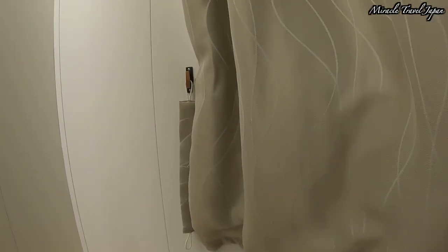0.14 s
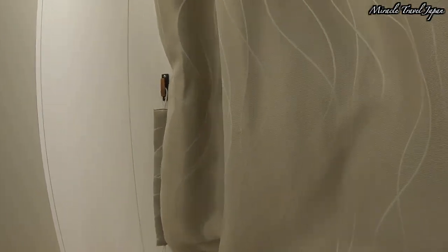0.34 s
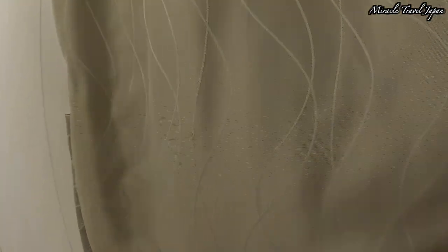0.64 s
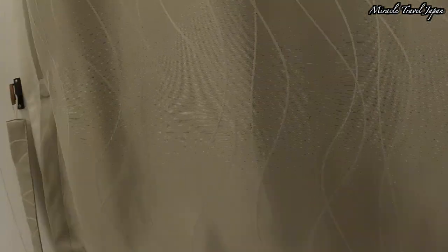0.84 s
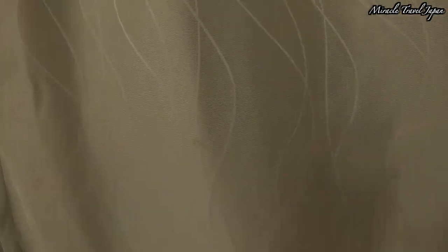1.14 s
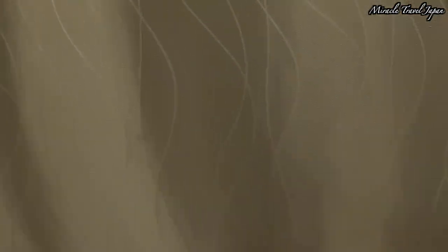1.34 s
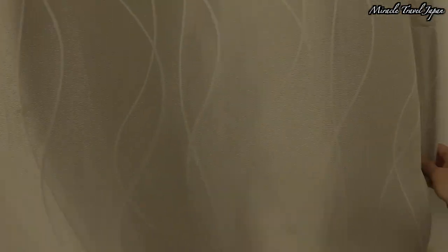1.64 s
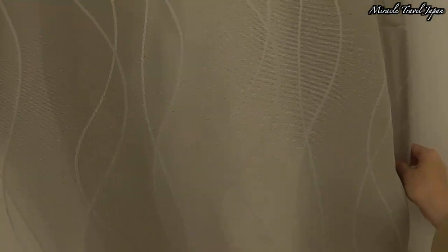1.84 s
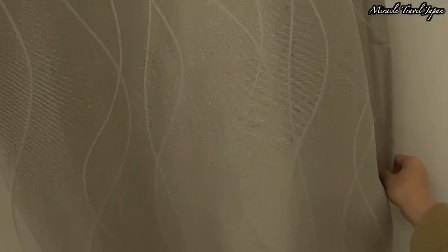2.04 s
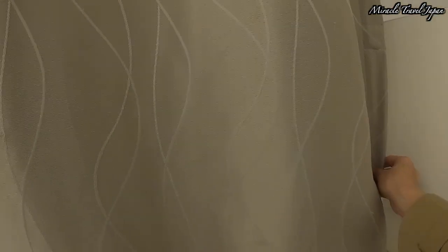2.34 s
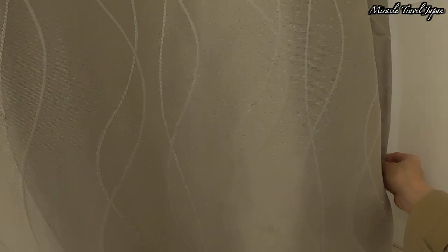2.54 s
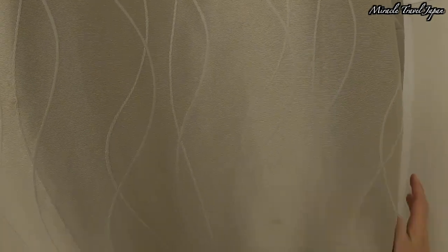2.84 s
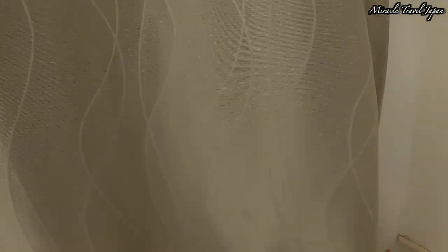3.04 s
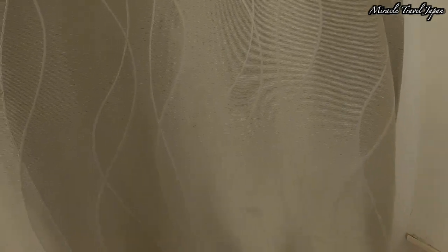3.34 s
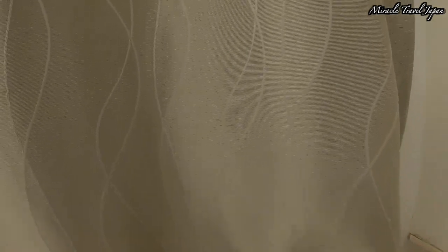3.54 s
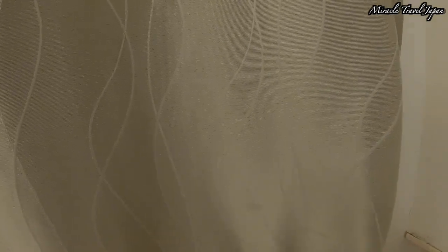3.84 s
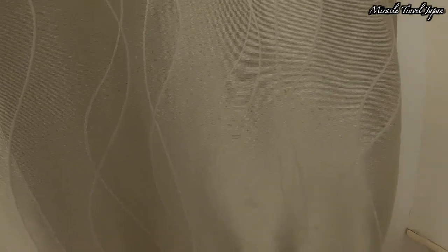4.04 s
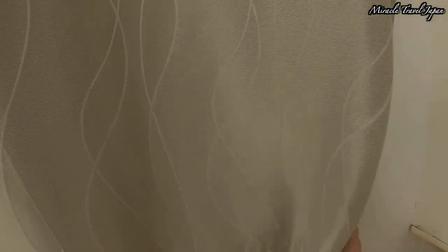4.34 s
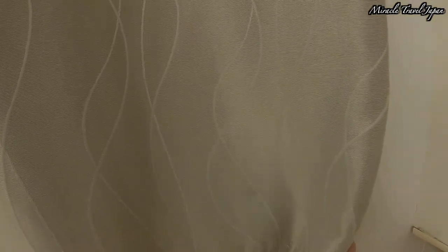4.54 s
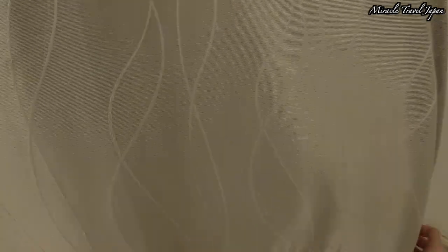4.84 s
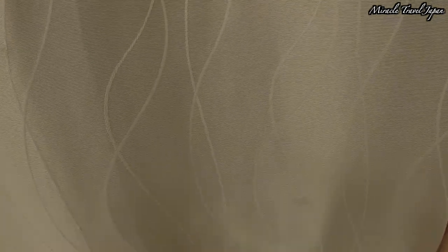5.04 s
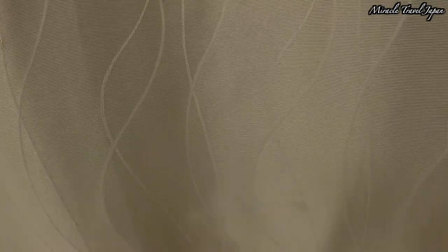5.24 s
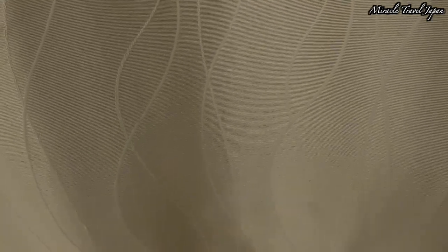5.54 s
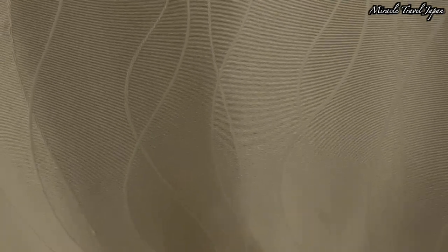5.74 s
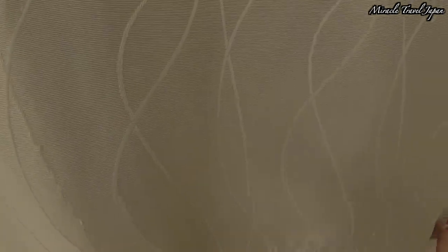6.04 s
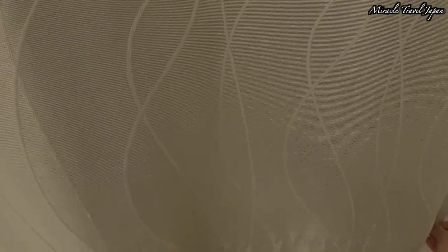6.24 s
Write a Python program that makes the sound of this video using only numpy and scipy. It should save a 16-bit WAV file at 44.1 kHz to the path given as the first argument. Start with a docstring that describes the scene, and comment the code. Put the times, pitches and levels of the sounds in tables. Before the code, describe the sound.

Close, stereo, indoors: a hand draws a fabric curtain, its plastic gliders making a short metallic-bright chatter that slows into a cluster of ticks. Gentle rustles fill the gaps over constant low humming air. Midway comes one loud, dry double-contact clack with a brief panel thud, then busier cloth handling and tiny clicks, and finally another loud clack of several rapid contacts. The snaps are far louder than everything else.

```python
"""Cabin curtain with a magnetic catch

A curtain is drawn along its rail in a small cabin. Gliders rattle in the track as streams of tiny impacts
through rail resonances; the cloth swishes as shaped noise, and small parts tick as short decaying tones.
Twice a magnetic catch in the hem snaps onto the wall panel: brief rings, cracks and a panel thump.
Ventilation rushes as coloured noise and hums, with a thin whine; a far engine throbs as wavering low sines.
"""
import sys
import numpy as np
from scipy import signal
from scipy.fft import rfft, irfft, next_fast_len
from scipy.io import wavfile
from scipy.ndimage import uniform_filter1d, map_coordinates

SR = 44100
rng = np.random.default_rng(int(sys.argv[2]) if len(sys.argv) > 2 else 0)


def transcribe(signal):
    """Save signal, clipped to [-1, 1], as a 16-bit WAV file at the path in sys.argv[1]."""
    frames = np.atleast_2d(signal).T
    limited = np.clip(frames, -1, 1)
    pcm = np.round(limited * 32767).astype(np.int16)
    wavfile.write(sys.argv[1], SR, pcm)


N = 281666

# slow swell of the ventilation: (time [s], rumble level [dB], duct hum level [dB])
AIR_SWELL = [(0, -41.5, -48), (.5, -39.5, -51.5), (1.4, -39, -51), (2.2, -44, -47), (3.3, -39, -49),
             (4.3, -41.5, -46.5), (5.0, -38, -49), (5.8, -39, -48), (6.39, -48, -50)]
# spectra of the low rumble and the duct hum: (frequency [Hz], density [dB per Hz])
RUMBLE_SPECTRUM = [(8, -22.5), (15, -8), (25, -4), (36, 0), (60, -8), (110, -15.5), (200, -34.5)]
DUCT_SPECTRUM = [(60, -21.5), (100, -12.5), (139, -1), (214, -15.5), (255, -4), (300, -18), (480, -25),
                 (640, -46.5), (790, -31), (850, -29), (920, -33), (1450, -31.5), (1900, -38), (2300, -55)]
# thin tones of the fan, before they waver: (frequency [Hz], rms level [dB])
FAN_WHINE = [(839.8, -79), (1287, -78.5), (1459, -80.5)]

# multiples of the engine's turning rate, from the second up, before they waver: (rms level [dB])
THROB_LEVELS = [-40.5, -40.5, -41, -45, -50.5, -51]
ENGINE_HZ = 7.45  # turns a second
BEAT_S, BEAT_PEAK_S, BEAT_DEPTH = 4.33, 3.83, .6  # swell of the lowest throb: period, a loudest moment, share

# moves of the hand in the cloth:
# (peak time [s], swell [s], fade [s], swish level [dB], weave over swish [dB], folds level [dB])
STROKES = [(.2, 0.61, 1.2, -49.5, -21, -62), (.36, 0.23, 0.12, -54, -29, -48.5),
           (.42, .3, .5, -73, -20.5, -54), (1.12, .4, 0.27, -64, -18.5, -49),
           (1.27, 0.083, 0.54, -61.5, -19, -77), (1.71, 0.37, 0.66, -58.5, -22.5, -61.5),
           (1.9, .5, 1.9, -67, -15, -69), (2.36, 0.25, 0.53, -64.5, -15, -74.5),
           (2.68, 0.026, 0.17, -63, -20, -53.5), (2.991, 0.69, 0.26, -56.5, -18, -57.5),
           (3.25, 0.27, 1.15, -70.5, -16, -77), (3.52, 0.13, .15, -67, -15, -67.5),
           (3.661, 0.056, 0.12, -65, -30, -54), (3.92, .06, 0.33, -64.5, -16, -60),
           (3.99, 0.17, 0.54, -60.5, -22.5, -61), (4.11, 0.096, 0.44, -64.5, -10, -80),
           (4.35, 0.093, 0.058, -53, -19, -54), (4.40, .05, 0.12, -53.5, -22, -49),
           (4.63, 0.38, 0.084, -62, -14.5, -71), (4.8, 0.087, .3, -59, -12, -65.5),
           (4.853, .03, 0.044, -45.5, -34, -52), (4.88, 0.11, 0.28, -53, -19, -55.5),
           (4.96, 0.12, 0.16, -56.5, -20, -55), (5.06, 0.014, .015, -47.5, -20, -71),
           (5.08, 0.17, 0.22, -69, -10, -54.5), (5.39, 0.032, 0.2, -67.5, -12.5, -67.5),
           (5.72, 0.18, .1, -64, -16, -70), (5.83, 0.13, .5, -63, -17, -68),
           (6.04, 0.2, 0.32, -61, -17, -63), (6.2, 0.17, 0.091, -63, -18, -67),
           (6.39, .1, 0.05, -58.5, -27, -64)]
STROKE_RANGE_DB = 20  # swell and fade times span this many dB
# spectra of the cloth's swish, fine weave and heavy folds: (frequency [Hz], density [dB per Hz])
SWISH_SPECTRUM = [(900, 2), (1500, 3), (2500, -2), (5000, -3.5), (7800, -11.5), (9500, -36)]
WEAVE_SPECTRUM = [(7000, -25.5), (8800, 3.5), (12000, -1.5), (13200, -5.5), (14500, -39.5)]
FOLDS_SPECTRUM = [(60, -18), (120, -4), (200, -9), (300, -5), (420, 1), (650, -1.5), (1000, -8.5),
                  (1500, -20.5)]

# pull along the rail: (time [s], rattle level [dB])
PULL = [(.34, -54), (.38, -45), (.45, -40), (.55, -27.5), (.64, -25), (.72, -24.5), (.80, -29),
        (.86, -37.5), (.92, -35), (.98, -39.5), (1.045, -40), (1.06, -44.5), (1.1, -48.5), (1.2, -57.5),
        (1.32, -75.5)]
# rail resonances that the gliders excite: (centre [Hz], width [Hz], relative level [dB])
RAIL_MODES = [(3450, 150, 1), (4054, 330, 0.5), (4420, 393, 1.5), (4840, 395, 1), (7065, 520, -8),
              (10300, 1400, -23.5)]
# narrow modes of gliders dragging singly, before squaring: (centre [Hz], width [Hz], relative level [dB])
CLEAR_MODES = [(3510, 160, -6), (3943, 230, -1.5), (4200, 130, -2), (4880, 120, -10), (7320, 82, -2.5)]
# spectra of the rail's low drone and its fizz: (frequency [Hz], density [dB per Hz])
DRONE_SPECTRUM = [(210, -44.5), (350, -16.5), (663, -4), (837, -7), (941, 0.5), (1190, -8), (1770, -6.5),
                  (2170, -13), (3000, -15), (3900, -38.5), (6600, -120)]
FIZZ_SPECTRUM = [(1470, -46.5), (2500, -8.5), (3390, -3.5), (4840, -10.5), (5810, -10.5), (7440, -13.5),
                 (8060, -16), (10400, -24), (14200, -38.5)]
# left-right balance of the rail: (frequency [Hz], left over right [dB])
RAIL_BALANCE = [(60, -1.5), (110, -4), (200, 3), (380, 1), (690, 3), (1270, 2.5), (2340, 4.5), (4320, 0),
                (7960, 4), (14700, -0.5)]
DRONE_TOP_DB, DRONE_OVER_DB = -31.5, 2.5  # ceiling of the drone; its level over the rattle well below that
FIZZ_DB, FIZZ_GROWS = -3.5, .05  # fizz over rattle at full pull; dB lost for each dB the pull weakens
SLOW_FROM_S, SLOW_TO_S, SLOW_EDGE_S = .75, 1.045, .01  # slow end of the pull, when gliders drag singly
CLEAR_FAST_DB, CLEAR_SLOW_DB = -8.5, -2.5  # clear ring over the rattle in the fast and in the slow part

# glider and hook ticks:
# (time [s], level [dB], pitch [Hz], T60 [s], crack over ring [dB], left over right [dB])
TICKS = [(0.393, -42, 3930, 0.055, -6, 5), (0.993, -26.5, 4140, 0.032, -19, 3),
         (1.0155, -31.5, 7230, 0.032, 5, 4.5), (1.015, -23, 4200, .015, -13, 7),
         (1.0207, -25, 4440, .012, -12, 3), (1.025, -25, 4250, .012, -14, 3),
         (1.0337, -42, 7060, .03, -16, 1), (2.997, -47.5, 1250, 0.06, -25, 4),
         (3.636, -49, 2690, 0.022, -4, -5), (3.659, -50, 2850, 0.035, -9, -2),
         (3.665, -51, 3010, 0.04, -14, -2.5), (4.327, -43.5, 3510, 0.013, -6, -4),
         (4.393, -36.5, 2517, 0.057, -23, -2), (4.4022, -41, 2590, 0.03, -17, -12),
         (4.411, -40, 2440, 0.023, -23, -1), (4.846, -33.5, 4250, 0.045, -0.5, 5),
         (4.883, -40.5, 4140, 0.028, -14, 6), (4.9452, -42.5, 3940, .03, -12, 5),
         (4.984, -50, 4000, .025, -12, 8), (5.0538, -49, 5270, 0.021, -3, -2)]
# crack of a tick: (frequency [Hz], gain [dB])
TICK_CRACK_COLOUR = [(1200, -15), (2000, 0), (6500, -3), (8500, -16), (13000, -24)]

# contacts of the catch: (time [s], ring level [dB], brightness [dB per two octaves above the second mode],
#                         crack drive [dB], panel thump drive [dB], left over right [dB])
SNAPS = [(3.0342, -3.5, 14, -6, -7.5, 0), (3.0400, -10.5, -8, -12, -7.5, 8),
         (6.0480, -6, 4, -8.5, -13.5, -3.5), (6.0547, -6.5, 8, -9, -7.5, -6), (6.0595, -6, -11, -20, -8, 1),
         (6.0650, -4, -17, -40, -8.5, 7)]
# modes of the catch: (frequency [Hz], relative level [dB], T60 [s])
CATCH_MODES = [(284.8, -19.5, 0.032), (1355, -1.5, 0.0061), (2090, -19, 0.026), (3700, -32, 0.0014),
               (4250, -0.5, 0.0017)]
# crack of a contact: (frequency [Hz], gain [dB])
CRACK_COLOUR = [(700, -44), (1500, 1), (3000, -3), (5200, -10.5), (6200, -29), (10000, -40.5)]
# wall panel thump, one list for the upper and one for the lower catch: (frequency [Hz], density [dB per Hz])
PANEL_SPECTRA = [
    [(35, -55), (60, -8), (136, -1.5), (342, -9.5), (430, -8.5), (526, -9), (606, -7), (1170, -12),
     (1290, -7.5), (2930, -27.5), (4600, -32), (8000, -63), (10400, -91), (17600, -120)],
    [(28, -14.5), (55, 6.5), (85, -6.5), (151, -2), (296, -5), (387, -11), (474, -1), (547, -8.5),
     (1240, -7), (3120, -28.5), (4800, -34), (8000, -54), (10400, -95), (17600, -120)],
]
# wall panel modes: (centre [Hz], width [Hz], level over the thump [dB])
PANEL_MODES = [(121, 16, 9.5), (188, 27, 1), (263, 8.7, 5.5), (336, 14, 7), (444, 17, -4), (993, 16, 7),
               (1360, 44, -22), (1640, 27, -7)]
# dying away of the wall panel: (frequency [Hz], T60 [s])
PANEL_DECAY = [(100, 0.27), (200, 0.41), (350, 0.42), (1000, 0.28), (3000, 0.29), (6000, 0.29)]
LOWER_FROM_S = 5  # the hand has moved to the lower catch
PUSH = 0.49  # size of the first push on the panel against its scattered answer

# stereo likeness of rail, far sounds and wall panel: (frequency [Hz], likeness [0-1])
NEAR_ALIKE = [(300, .93), (700, .82), (1400, .76), (2800, .62), (4500, .8), (9000, .6), (13000, .75)]
FAR_ALIKE = [(30, .98), (80, .98), (170, .993), (300, .94), (630, .7), (1400, .65), (3000, .45), (7000, .6),
             (14000, .5)]
PANEL_ALIKE = [(60, .97), (140, .998), (400, .93), (1000, .8), (2500, .78), (5000, .85)]

# steady hiss of the microphone: (frequency [Hz], density [dB per Hz])
HISS_SPECTRUM = [(1500, 9.5), (3000, -6), (7500, -3), (9000, -12.5), (14000, -28.5)]
TOP_HZ = 15200  # nothing is heard above


def amp(db):
    """Decibels to gain."""
    return 10 ** (np.asarray(db) / 20)


def unit(x):
    """Scaled to rms 1."""
    return x / np.sqrt(np.mean(x ** 2) + 1e-20)


def along(points, hz):
    """Reads (frequency, value) points on a log frequency axis."""
    f, values = np.transpose(points)
    return np.interp(np.log(hz + 1), np.log(f + 1), values)


def curves(rows):
    """One value per sample for each column after the time."""
    times, *columns = np.transpose(rows)
    return [np.interp(np.arange(N) / SR, times, column) for column in columns]


def wobble(rate):
    """A smooth random curve, rate knots a second."""
    knots = rng.standard_normal(int(N * rate / SR) + 4)
    return map_coordinates(knots, [np.arange(N) * rate / SR])


def filtered(x, response):
    """x through a complex response of frequency."""
    size = next_fast_len(N + SR // 2)
    hz = np.fft.rfftfreq(size, 1 / SR)
    return irfft(rfft(x, size) * response(hz), size)[..., :N]


def coloured(spectrum):
    """Response with the given spectrum, closing steeply outside it."""
    below, above = (spectrum[0][0] / 2, -120), (spectrum[-1][0] * 2, -120)
    closed = [below] + list(spectrum) + [above]
    return lambda hz: amp(along(closed, hz))


def resonances(modes):
    """Causal response of damped modes, with alternating signs."""
    def mode(f, centre, width, db):
        return amp(db) * 1j * f * width / (centre * centre - f * f + 1j * f * width)
    return lambda f: sum((-1) ** k * mode(f, *row) for k, row in enumerate(modes))


def causal(response):
    """Minimum phase: the same colour, with nothing ahead of the blow."""
    def delayed(hz):
        cepstrum = irfft(np.log(np.abs(response(hz)) + 1e-6))
        cepstrum[1:len(hz) - 1] *= 2
        cepstrum[len(hz):] = 0
        return np.exp(rfft(cepstrum))
    return delayed


def grains(grain_db):
    """Two streams of tiny impacts with unequal but bounded level boosts."""
    boost = np.minimum(rng.exponential(size=N), np.e)
    return rng.standard_normal((2, N)) * amp(grain_db * boost)


def spread(pair, response, alike):
    """Colours two streams and mixes them to a stereo image of rms 1."""
    def mid_side(hz):
        turn = np.arccos(np.clip(along(alike, hz), 0, 1)) / 2
        return response(hz) * [np.cos(turn), np.sin(turn)]
    mid, side = filtered(pair, mid_side)
    return unit(np.array([mid + side, mid - side]))


def add(track, s, sound, pan_db):
    """Places a sound at time s with a left-right level step."""
    start = round(s * SR)
    track[:, start:start + sound.shape[-1]] += sound * amp([[pan_db / 2], [-pan_db / 2]])


def dying(decay):
    """Stereo noise, left energy 1, in which each frequency dies at its own speed."""
    hz, t, cells = signal.stft(rng.standard_normal((2, SR // 2)), SR, nperseg=256)
    fade = amp(-60 * t / along(decay, hz)[:, None])
    tail = signal.istft(cells * fade, SR, nperseg=256)[1]
    return tail / np.linalg.norm(tail[0])


def ventilation():
    """Swelling low rumble and a breathy duct hum, both shaped noise, with thin wavering fan tones."""
    t = np.arange(N) / SR
    rumble_db, duct_db = curves(AIR_SWELL)
    rumble = amp(rumble_db) * spread(rng.standard_normal((2, N)), coloured(RUMBLE_SPECTRUM), FAR_ALIKE)
    breath_db = 1.8 * wobble(4)
    duct = spread(rng.standard_normal((2, N)), coloured(DUCT_SPECTRUM), FAR_ALIKE)
    duct = amp(duct_db + breath_db) * duct
    whine = 0
    for hz, db in FAN_WHINE:
        level = np.sqrt(2) * amp(db + 3 * wobble(7.9))
        whine = whine + level * np.sin(2 * np.pi * hz * t + 1.3 * wobble(6))
    return rumble + duct + whine


def engine():
    """Low multiples of the turning rate, each wavering a little in level and phase."""
    t, total = np.arange(N) / SR, 0
    beat = 1 + np.clip(BEAT_DEPTH, 0, 1) * np.cos(2 * np.pi * (t - BEAT_PEAK_S) / BEAT_S)
    for k, db in enumerate(THROB_LEVELS, start=2):
        phase = 2 * np.pi * (k * ENGINE_HZ * t + rng.random()) + .4 * wobble(1.53)
        level = np.sqrt(2) * amp(db + 2.5 * wobble(1.5))
        swell = beat if k == 2 else 1
        total = total + level * swell * np.sin(phase)
    return total


def cloth():
    """Fabric rubbing on fabric: each stroke swells and fades in swish, fine weave hiss and low folds."""
    spectra = (SWISH_SPECTRUM, WEAVE_SPECTRUM, FOLDS_SPECTRUM)
    layers = np.array([spread(grains(grain_db=3.0), coloured(s), FAR_ALIKE) for s in spectra])
    t, power = np.arange(N) / SR, np.zeros((3, N))
    for s, swell, fade, swish_db, weave_db, folds_db in STROKES:
        shape = amp(-STROKE_RANGE_DB * np.maximum((s - t) / swell, (t - s) / fade))
        levels = amp([swish_db, swish_db + weave_db, folds_db])
        power += np.outer(levels, shape) ** 2  # strokes overlap by power
    mix = (np.sqrt(power)[:, None] * layers).sum(0)
    return mix * amp(1.0 * wobble(40))


def rail():
    """Gliders chatter over the track and set its resonances going."""
    before, after = (PULL[0][0] - .05, -100), (PULL[-1][0] + 0.13, -100)
    rattle_db, = curves([before] + list(PULL) + [after])
    # these levels are relative to the rattle
    drone_db = -10 * np.log10(amp(-2 * DRONE_OVER_DB) + amp(2 * (rattle_db - DRONE_TOP_DB)))
    fizz_db = FIZZ_DB + FIZZ_GROWS * (rattle_db - rattle_db.max())
    clear_db, = curves([(SLOW_FROM_S - SLOW_EDGE_S, CLEAR_FAST_DB), (SLOW_FROM_S, CLEAR_SLOW_DB),
                        (SLOW_TO_S, CLEAR_SLOW_DB), (SLOW_TO_S + SLOW_EDGE_S, 2 * CLEAR_FAST_DB)])
    jerk = wobble(90)  # the gliders stick and slip in clumps
    flutter_db = 3 * wobble(60)

    rattle = amp(1.1 * jerk) * spread(grains(grain_db=5), resonances(RAIL_MODES), NEAR_ALIKE)
    sharp_modes = lambda hz: resonances(CLEAR_MODES)(hz) ** 2
    clear = amp(clear_db + flutter_db) * spread(grains(grain_db=4), sharp_modes, NEAR_ALIKE)
    drone = spread(grains(grain_db=3.0), coloured(DRONE_SPECTRUM), NEAR_ALIKE)
    drone = amp(drone_db + 0.66 * jerk) * drone
    fizz = spread(grains(grain_db=1.0), coloured(FIZZ_SPECTRUM), NEAR_ALIKE)
    fizz = amp(fizz_db + 0.28 * jerk) * fizz

    sound = amp(rattle_db) * (rattle + clear + drone + fizz)
    return filtered(sound, lambda hz: amp(np.outer([.5, -.5], along(RAIL_BALANCE, hz))))


def ticks():
    """Small plastic parts touching: one rough mode over a short dull crack."""
    ring, crack = np.zeros((2, 2, N + SR))
    t = np.arange(SR // 10) / SR
    rise = 1 - np.exp(-(t / 0.00067) ** 2)
    for s, db, hz, t60, crack_db, pan_db in TICKS:
        drift = uniform_filter1d(np.cumsum(rng.standard_normal(len(t))), size=30)  # roughens the pitch
        tone = np.sin(2 * np.pi * hz * t + 0.16 * drift)
        add(ring, s, amp(db - 60 * t / t60) * rise * tone, pan_db)
        noise = rng.standard_normal(len(t))
        add(crack, s, amp(db + crack_db - 60 * t / 0.044) * rise * noise, pan_db)
    return ring[:, :N] + filtered(crack[:, :N], coloured(TICK_CRACK_COLOUR))


def cabin(x):
    """The small room answers with a diffuse tail whose treble dies first."""
    late = np.pad(x.mean(0), (200, 0))[None]  # delay in samples
    tail = dying([(300, .35), (3000, .22), (9000, 0.12)])
    return signal.fftconvolve(late, tail, axes=1)[:, :N]


def catch():
    """Each contact rings the catch briefly, cracks, and shakes the wall panel."""
    ring, crack, *thumps = np.zeros((4, 2, N + SR))
    t = np.arange(SR // 20) / SR
    rise = 1 - np.exp(-(t / 0.00053) ** 2)
    for s, db, bright_db, crack_db, thump_db, pan_db in SNAPS:
        sound = 0
        for hz, level, t60 in CATCH_MODES:
            octaves_up = max(0, np.log2(hz / CATCH_MODES[1][0]))
            mode_db = level + bright_db * octaves_up / 2 - 60 * t / t60
            sound = sound + amp(mode_db) * np.sin(2 * np.pi * hz * t)
        add(ring, s, amp(db) * sound * rise, pan_db)

        # noise shared by both sides, plus some of each side's own
        noise = rng.standard_normal(len(t)) + 0.46 * rng.standard_normal((2, len(t)))
        add(crack, s, amp(crack_db - 60 * t / 0.015) * rise * noise, pan_db)

        tail = dying(PANEL_DECAY)
        n = np.arange(tail.shape[1])
        tail = tail * (1 - np.exp(-n / SR / 0.00188)) + PUSH * (n == 0)
        add(thumps[int(s > LOWER_FROM_S)], s, amp(thump_db) * tail, 0)

    total = ring[:, :N] + filtered(crack[:, :N], causal(coloured(CRACK_COLOUR)))
    for thump, colour in zip(thumps, PANEL_SPECTRA):
        panel = lambda hz: coloured(colour)(hz) * (1 + np.abs(resonances(PANEL_MODES)(hz)))
        level = np.sqrt(np.mean(thump[:, :N] ** 2))  # spread() sets rms 1, so keep the drive
        total += amp(15.0) * level * spread(thump[:, :N], causal(panel), PANEL_ALIKE)
    return total


def scene():
    """All sources together, with the room's answer to the ticks."""
    small = ticks()
    echo = amp(-11) * cabin(small)
    return ventilation() + engine() + cloth() + rail() + small + echo + catch()


def record(dry):
    """The microphone hisses, its left port lags a sample in the low range, and the top closes steeply."""
    hiss = amp(-71.0) * spread(rng.standard_normal((2, N)), coloured(HISS_SPECTRUM), FAR_ALIKE)
    # half a sample late on the left, half a sample early on the right
    lag = lambda hz: np.exp(np.outer([-1j, 1j], np.pi * hz / SR / (1 + (hz / 6000) ** 2)))
    fade = lambda hz: amp(along([(14000, -0.5), (14400, -16.5), (15000, -29)], hz))
    return filtered(dry + hiss, lambda hz: lag(hz) * fade(hz) * (hz < TOP_HZ))


dry = scene()
out = record(dry)
transcribe(out)
```